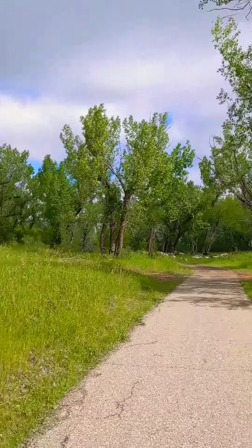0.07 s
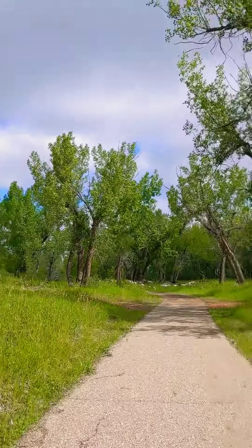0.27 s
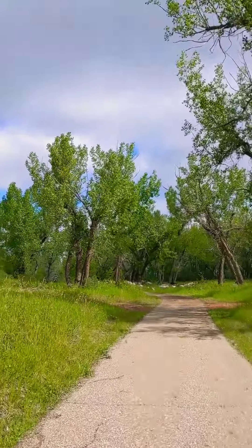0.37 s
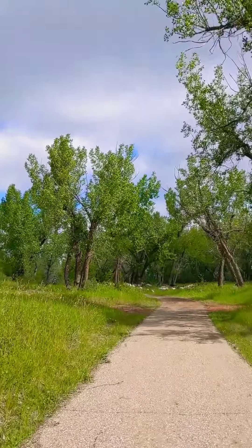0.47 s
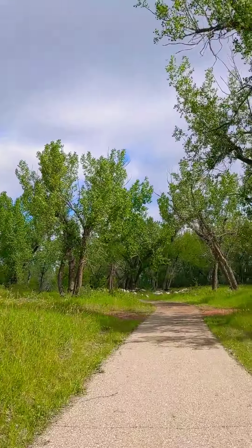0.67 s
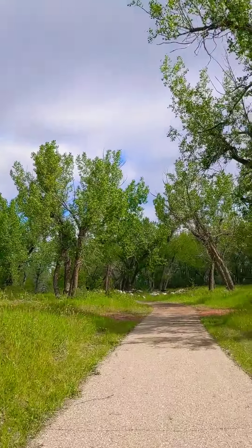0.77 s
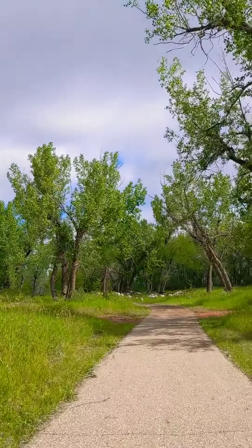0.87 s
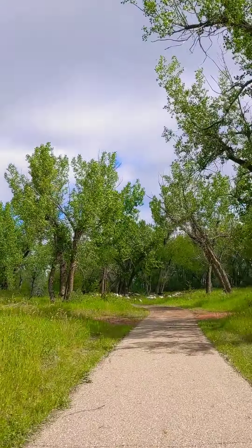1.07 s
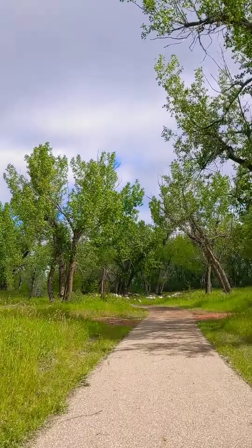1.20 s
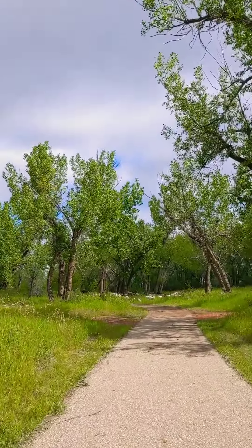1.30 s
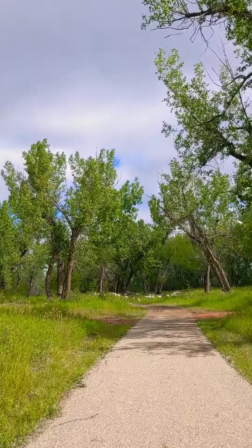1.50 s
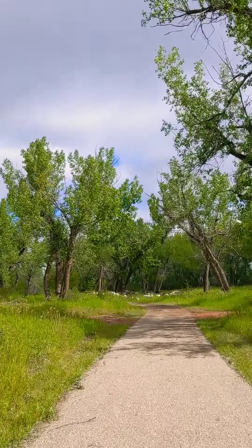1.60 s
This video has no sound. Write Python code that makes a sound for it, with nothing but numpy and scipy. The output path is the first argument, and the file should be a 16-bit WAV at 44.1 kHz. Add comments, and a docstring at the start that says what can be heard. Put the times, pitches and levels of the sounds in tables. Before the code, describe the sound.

Footsteps scuff and crack on a paved park path, with handling ticks and a faint bird trill

```python
"""A walk with a phone in the hand

Steps on a paved park path thud, scuff and crack, and the grip rubs, ticks and bumps the case close to the right
microphone: friction is shaped noise, blows are short decaying oscillations. Light wind, noise under a gust curve,
buffets mostly the left one. A small bird calls and trills in gliding sines over the hush of the trees,
which is steady coloured noise."""
import sys
import numpy as np
from scipy import signal
from scipy.fft import rfft, irfft
from scipy.io import wavfile

SR = 44100
rng = np.random.default_rng(int(sys.argv[2]) if len(sys.argv) > 2 else 0)


def log_audio(samples):
    """Write samples as a 16-bit WAV file to the path given in sys.argv[1]."""
    # one column per channel
    frames = np.atleast_2d(samples).T
    # limit to full scale, then quantise
    limited = np.clip(frames, -1, 1)
    pcm = np.round(limited * 32767).astype(np.int16)
    wavfile.write(sys.argv[1], SR, pcm)


N = 72765
T = np.arange(N) / SR  # seconds

# Spectra of the hush of the trees at each microphone. Each row: frequency in Hz, relative density in dB per Hz.
TREES_LEFT_SPECTRUM = [(60, 7), (200, -4), (500, 2), (1000, -0.5), (2000, -3.5), (4000, -3.5), (5800, -7),
                       (7200, -13.5), (11000, -12.5), (16000, -23)]
TREES_RIGHT_SPECTRUM = [(60, 8.5), (200, 0.5), (400, -1), (900, 1.5), (1600, -2), (2600, 1), (4000, -6.5),
                        (5800, -8.5), (6800, -21), (8500, -15.5), (12000, -13.5), (16000, -19.5)]
TREES_LEFT_DB, TREES_RIGHT_DB = -53, -50.5  # rms
SWAY_DB, SWAY_HZ = .3, 1.5  # rms depth, and the frequency above which the sway falls off

# Spectrum of the wind rumble. Each row: frequency in Hz, relative density in dB per Hz.
WIND_SPECTRUM = [(15, -5), (30, 2.5), (55, -1.5), (90, -9), (140, -14.5), (250, -35.5), (600, -79)]
# Strength of the wind at the left port. Each row: time in seconds, rms level in dB.
GUST_LEVEL = [(0, -59), (.19, -55), (.25, -43), (.40, -48.5), (.56, -43.5), (.69, -59), (.78, -43),
              (.87, -52), (1.07, -47), (1.18, -45), (1.32, -42), (1.43, -41.5), (1.52, -44.5),
              (1.65, -46.5)]
# Puffs of wind on the left port. Each row: start in seconds, peak level in dB, frequency in Hz.
PUFFS = [(.444, -34.5, 52), (0.519, -36.5, 119), (.745, -34, 32), (1.040, -35.5, 54), (1.295, -33.5, 55.6),
         (1.324, -31.5, 77), (1.508, -33.5, 78)]
PUFF_CYCLES, WIND_RIGHT_DB = .232, -13.5  # decay in cycles; gusts on the right relative to the left

# Spectrum of the moving hand's rumble. Each row: frequency in Hz, relative density in dB per Hz.
HAND_SPECTRUM = [(20, 3.5), (70, 1.5), (140, -8), (250, -13.5), (500, -18)]
# Strength of that rumble on the right. Each row: time in seconds, rms level in dB.
HAND_LEVEL = [(0, -49.5), (.25, -73), (.32, -58), (.5, -59), (.64, -44), (.72, -53.5), (.82, -45),
              (1.0, -51.5), (1.3, -51.5), (1.65, -67)]
# Thuds of steps and of the grip. Each row: start in seconds, peak level on the right in dB, frequency in Hz.
THUDS = [(0.387, -13, 89.6), (0.396, -29.5, 30.7), (0.582, -27, 54), (1.222, -31.5, 38.4)]
THUD_CYCLES, THUD_LEFT_DB = .19, -17.5  # decay in cycles; left relative to right

# Ticks of the case and of grit, as heard on the right. Each row: start in seconds, knock peak in dB,
# knock frequency in Hz, knock decay in cycles, snap peak in dB.
TICKS = [(0.0245, -30.5, 543, 0.18, -35.5), (0.1486, -16, 980, 0.25, -37), (0.216, -27.5, 860, 0.31, -4.5),
         (0.3759, -24, 3600, 1.2, -21), (0.3787, -23.5, 2900, 0.62, -14.5), (.3811, -26, 4400, 0.75, -23),
         (0.382, -22.5, 3580, 0.69, -20), (0.3895, -19.5, 275, 0.21, -50), (0.4852, -29, 1590, 0.29, -31.5),
         (0.5807, -27.5, 189, 0.097, -44), (0.5854, -29.5, 490, 0.17, -38), (0.6367, -29, 1030, 0.21, -45),
         (0.6739, -34, 307, 0.13, -55), (0.8821, -28.5, 1700, 0.17, -46), (.8835, -32, 380, .22, -50),
         (1.0517, -26.5, 1040, 0.2, -37), (1.2112, -30.5, 1720, 0.89, -50), (1.217, -27, 1490, 0.2, -24.5)]
# Spectrum of the snap. Each row: frequency in Hz, relative level in dB.
SNAP_SPECTRUM = [(300, -39), (1500, -7), (2800, -5), (4200, 2), (6000, 0.5), (7600, -8), (10500, 2.5),
                 (13000, -7.5), (16000, -18)]
KNOCK_SWELL, TICK_LEFT_DB = 1.55, -22.5  # exponent of the onset; left relative to right

# Strokes of scuffing and rubbing, as heard on the right. Each row: peak time in seconds, rise in seconds,
# fall in seconds, body level in dB, scrape level in dB, hiss level in dB, grit as a share from 0 to 1.
SCUFFS = [(.068, 0.028, 0.021, -61, -46, -56, 0.2), (.145, 0.032, 0.033, -49, -57, -57, 0.14),
          (.328, 0.014, 0.064, -49.5, -50.5, -65, 0.54), (.380, 0.0064, 0.0021, -33, -28, -40, 0.66),
          (.395, 0.0092, 0.0085, -38, -38, -26.5, 0.04), (.440, 0.01, 0.01, -52.5, -50.5, -49, 0.37),
          (0.497, 0.013, 0.023, -57, -46.5, -51, 0.03), (.535, 0.026, 0.032, -59, -54.5, -42.5, .2),
          (.642, 0.031, 0.019, -72, -47.5, -46, 0.1), (.815, 0.0084, .011, -56, -49, -48.5, 0.03),
          (.852, 0.0089, .016, -53, -52, -51.5, 0.03), (1.0, 0.052, 0.041, -45.5, -42.5, -49, 0.33),
          (1.042, .025, 0.023, -46, -42.5, -43, 0.14), (1.218, 0.009, 0.018, -46.5, -43, -49.5, 0.47),
          (1.300, 0.013, 0.022, -48, -55, -69, 0.5), (1.344, 0.026, 0.013, -50, -46.5, -47, 0.3)]
# Spectra of the three voices of the friction. Each row: frequency in Hz, relative density in dB per Hz.
BODY_SPECTRUM = [(150, -5), (350, -11.5), (650, -4.5), (1030, 0), (1450, -7), (2500, -12)]
SCRAPE_SPECTRUM = [(700, -32), (1400, -4), (2300, 0), (3300, -5), (4800, -4), (7200, -13.5), (10000, -12),
                   (16000, -50)]
HISS_SPECTRUM = [(4000, -16.5), (7500, -15.5), (9500, -5), (11500, 0), (13500, -1.5), (16000, -9)]
GRAINS_PER_S, GRAIN_SPREAD_DB, SCUFF_LEFT_DB = 2500, 5, -21.5  # mean slip rate; spread; left relative to right

# Heel contacts, as heard on the right. Each row: start in seconds, sole level in dB, crack level in dB.
HEELS = [(.3768, -24.5, -41), (.3815, -20.5, -30.5), (1.212, -52, -33.5), (1.2170, -39, -29.5)]
# Modes of the sole and of the crack. Each row: frequency in Hz, relative level in dB, t60 in seconds.
SOLE_MODES = [(700, 1.5, .015), (850, -5, 0.019)]
CRACK_MODES = [(423, -5.5, 0.015), (1020, 5.5, 0.0097), (1660, -10, 0.0083), (2270, -6.5, 0.0093)]
HEEL_LEFT_DB = -23  # relative to right

# High notes before the trill. Each row: start in seconds, length in seconds, nominal start frequency in Hz,
# nominal end frequency in Hz, level in dB.
CALL_NOTES = [(.702, .011, 5600, 7400, -60), (.710, .011, 7400, 5600, -58), (.724, .024, 7600, 5850, -59.5),
              (.886, .012, 8200, 7400, -60), (.931, .011, 7900, 7500, -55), (.943, .011, 7000, 6200, -59)]
# The two notes of each syllable. Each row: delay in seconds, length in seconds, nominal start frequency in Hz,
# nominal end frequency in Hz.
SYLLABLE = [(0, .019, 4850, 4000), (.0485, .022, 4200, 5770)]
# Strength of each trill syllable. Each row: falling note in dB, rising note in dB.
TRILL_LEVELS = [(-49, -48.5), (-48.5, -47.5), (-49, -48), (-48, -46.5), (-51.5, -48.5)]
TRILL_START_S, TRILL_PERIOD_S = 1.0935, .1012
GLIDE_SHARE, NOTE_SKEW = .75, 1.3  # share of the note spent gliding; exponent that delays its maximum
FLUTTER_DB, FLUTTER_HZ = 2.5, 220  # spread of the random levels; new levels per second
BIRD_RIGHT_DB = -8  # direct song, relative to left
BIRD_ECHO_DB, BIRD_ECHO_S = -4, .12  # echo gain; time for its amplitude to fall to 1/e

# One pitched rub, as heard on the right. The row: start in seconds, length in seconds, start frequency in Hz,
# end frequency in Hz, width in Hz, level in dB.
RUB = (1.287, .074, 830, 1130, 340, -44)

TOP_HZ = 15950  # upper edge of the pass band


def undb(db):
    """Logarithmic level: decibels become an amplitude gain."""
    return 10 ** (np.asarray(db) / 20)


def gains(points):
    """Spectral envelope: gain per bin from (Hz, dB) points, falling 10 dB per octave beyond its ends."""
    hz, db = np.array(points, float).T
    octave = np.log2(np.maximum(np.arange(N // 2 + 1) * SR / N, 1))
    beyond = np.abs(octave - np.clip(octave, np.log2(hz[0]), np.log2(hz[-1])))
    return undb(np.interp(octave, np.log2(hz), db) - 10 * beyond)


def shaped(x, points):
    """Linear filtering: the spectrum is multiplied by an envelope and the result brought to rms 1."""
    y = irfft(rfft(x - x.mean()) * gains(points), N)
    return y / y.std()


def noise(points):
    """Coloured noise: white Gaussian noise filtered to rms 1."""
    return shaped(rng.standard_normal(N), points)


def knock(start, hz, cycles, swell=2):
    """Heavily damped oscillation: a soft blow swells as a power of time and decays exponentially; peak 1."""
    u = np.maximum(T - start, 0) * hz  # time in cycles
    y = -u ** swell * np.exp(-u / cycles) * np.sin(2 * np.pi * u)
    return y / np.abs(y).max()


def trees():
    """Incoherent superposition: distant leaves sum to independent noise per ear, swaying a little in level."""
    sway = undb(SWAY_DB * noise([(SWAY_HZ, 0), (10 * SWAY_HZ, -60)]))
    left = undb(TREES_LEFT_DB) * noise(TREES_LEFT_SPECTRUM)
    right = undb(TREES_RIGHT_DB) * noise(TREES_RIGHT_SPECTRUM)
    return sway * np.array([left, right])


def wind():
    """Local turbulence: gusts rumble on each port separately, and single puffs hit the left one."""
    gust = undb(np.interp(T, *np.array(GUST_LEVEL).T))
    puffs = sum(undb(db) * knock(start, hz, PUFF_CYCLES) for start, db, hz in PUFFS)
    left = gust * noise(WIND_SPECTRUM) + puffs
    right = gust * undb(WIND_RIGHT_DB) * noise(WIND_SPECTRUM)
    return np.array([left, right])


def thuds():
    """Structure-borne sound: low jolts and rumble reach the phone through the hand."""
    jolts = sum(undb(db) * knock(start, hz, THUD_CYCLES) for start, db, hz in THUDS)
    rumble = undb(np.interp(T, *np.array(HAND_LEVEL).T)) * noise(HAND_SPECTRUM)
    return (jolts + rumble) * undb([[THUD_LEFT_DB], [0]])


def snap_response():
    """Minimum phase: folding the cepstrum packs the snap's energy at its onset; peak 1."""
    cepstrum = irfft(np.log(gains(SNAP_SPECTRUM)), N)
    causal = 2 * cepstrum * (np.arange(N) < N // 2)
    snap = irfft(np.exp(rfft(causal)), N)[:512]
    return snap / np.abs(snap).max()


def ticks():
    """Impact excitation: each tick is a damped knock with a broadband snap on top."""
    hits, knocks = np.zeros(N), 0
    for start, knock_db, hz, cycles, snap_db in TICKS:
        hits[int(start * SR)] += undb(snap_db)
        knocks = knocks + undb(knock_db) * knock(start, hz, cycles, swell=KNOCK_SWELL)
    snaps = np.convolve(hits, snap_response())[:N]
    return (knocks + snaps) * undb([[TICK_LEFT_DB], [0]])


def friction(points, column):
    """Stick-slip: smooth sliding mixes with tiny random slips, swelling and fading with each stroke."""
    occurs = rng.random(N) < GRAINS_PER_S / SR
    signs = rng.choice([-1, 1], N)
    strengths = undb(GRAIN_SPREAD_DB * np.clip(rng.standard_normal(N), -2, 2))
    grains, slide = shaped(occurs * signs * strengths, points), noise(points)
    rough = smooth = 0
    for peak, rise, fall, *dbs, grit in SCUFFS:
        distance = np.abs((T - peak) / np.where(T < peak, rise, fall))
        power = undb(dbs[column]) ** 2 * np.exp(-distance ** 1.95)
        share = np.clip(grit, 0, 1)
        rough = rough + share * power
        smooth = smooth + (1 - share) * power
    return np.sqrt(rough) * grains + np.sqrt(smooth) * slide


def scuffs():
    """Diffuse field: friction is close on the right, faint and independent in waveform on the left."""
    voices = (BODY_SPECTRUM, SCRAPE_SPECTRUM, HISS_SPECTRUM)
    left, right = (sum(friction(voice, k) for k, voice in enumerate(voices)) for _ in range(2))
    return np.array([undb(SCUFF_LEFT_DB) * left, right])


def ring(start, modes):
    """Modal superposition: a struck body sounds as a sum of exponentially decaying sines."""
    u = np.maximum(T - start, 0)
    return -sum(undb(db - 60 * u / t60) * np.sin(2 * np.pi * hz * u) for hz, db, t60 in modes)


def heels():
    """Modal impact: heel edge, then flat, each rings the hollow sole and cracks on the paving."""
    blows = 0
    for start, sole_db, crack_db in HEELS:
        blows = blows + undb(sole_db) * ring(start, SOLE_MODES)
        blows = blows + undb(crack_db) * ring(start, CRACK_MODES)
    return blows * undb([[HEEL_LEFT_DB], [0]])


def note(start, length, from_hz, to_hz, db):
    """Frequency modulation: a whistle glides in pitch, peaks past its middle and flutters in level."""
    u = np.clip((T - start) / length, 0, 1)
    slide = np.sin(np.pi * np.clip((u - .5) / GLIDE_SHARE, -.5, .5))
    detune = 1 + .012 * rng.standard_normal()  # one random factor for the whole note
    hz = (from_hz + (to_hz - from_hz) * (1 + slide) / 2) * detune
    flutter = np.interp(T * FLUTTER_HZ, np.arange(N), rng.standard_normal(N))
    envelope = undb(db + FLUTTER_DB * flutter) * np.sin(np.pi * u ** NOTE_SKEW)
    return envelope * np.sin(2 * np.pi * np.cumsum(hz) / SR)


def bird():
    """Direct and scattered sound: high notes, then an even down-up trill, convolved with tails from the trees."""
    song = sum(note(*row) for row in CALL_NOTES)
    for k, levels in enumerate(TRILL_LEVELS):
        for (delay, *glide), db in zip(SYLLABLE, levels):
            song = song + note(TRILL_START_S + k * TRILL_PERIOD_S + delay, *glide, db)
    tails = rng.standard_normal((2, N)) * np.exp(-T / BIRD_ECHO_S)
    # each tail has unit energy
    echo = np.array([signal.fftconvolve(song, tail / np.linalg.norm(tail))[:N] for tail in tails])
    return song * undb([[0], [BIRD_RIGHT_DB]]) + undb(BIRD_ECHO_DB) * echo


def rub():
    """Rising resonance: narrow noise on a sliding carrier follows a contact that tightens."""
    start, length, from_hz, to_hz, width_hz, db = RUB
    u = np.clip((T - start) / length, 0, 1)
    phase = 2 * np.pi * np.cumsum(from_hz + (to_hz - from_hz) * u) / SR
    in_phase, quadrature = (noise([(width_hz / 2, 0), (2 * width_hz, -24)]) for _ in range(2))
    band = in_phase * np.cos(phase) + quadrature * np.sin(phase)
    envelope = undb(db) * np.sqrt(np.abs(np.sin(np.pi * u)))
    return envelope * band * undb([[SCUFF_LEFT_DB], [0]])


def scene():
    """Linear superposition: the pressures of all sources on the path add."""
    return trees() + wind() + thuds() + ticks() + scuffs() + heels() + bird() + rub()


def record(dry):
    """Band limiting: the phone cuts the top with a steep elliptic low-pass."""
    low_pass = signal.ellip(10, .2, 80, TOP_HZ, fs=SR, output="sos")  # ripple and stop band in dB
    return signal.sosfilt(low_pass, dry)


dry = scene()
out = record(dry)
log_audio(out)
```